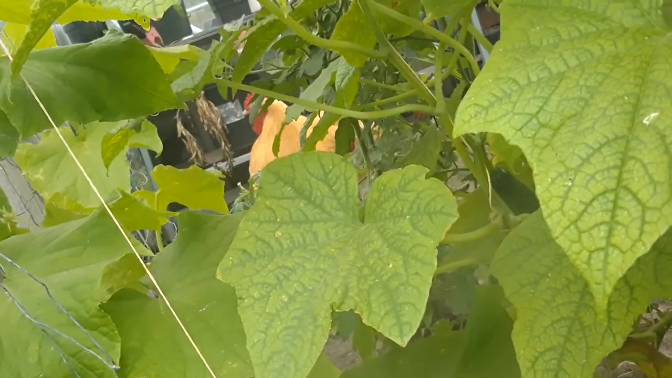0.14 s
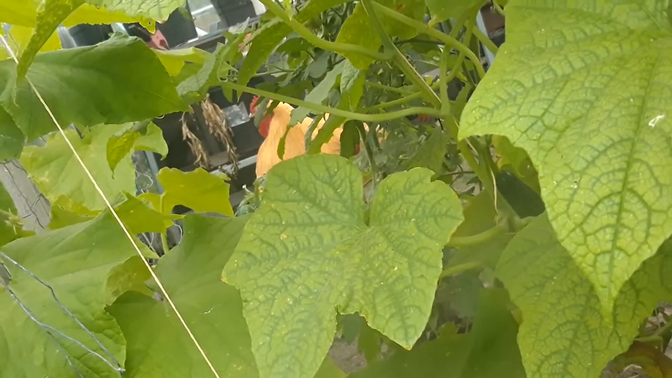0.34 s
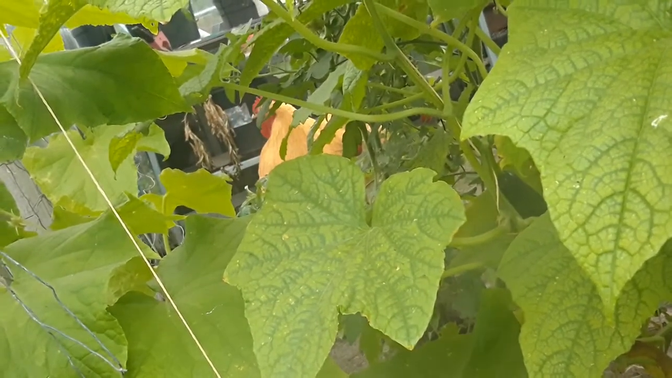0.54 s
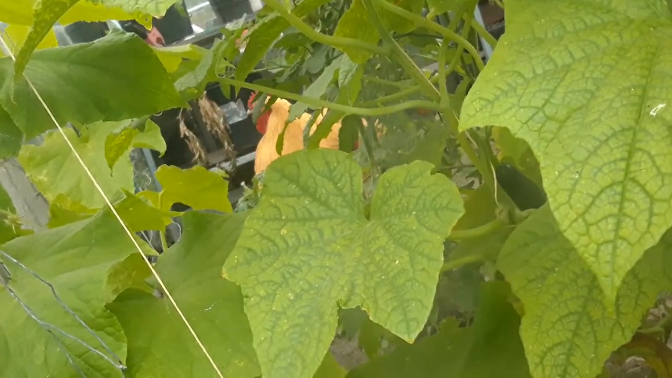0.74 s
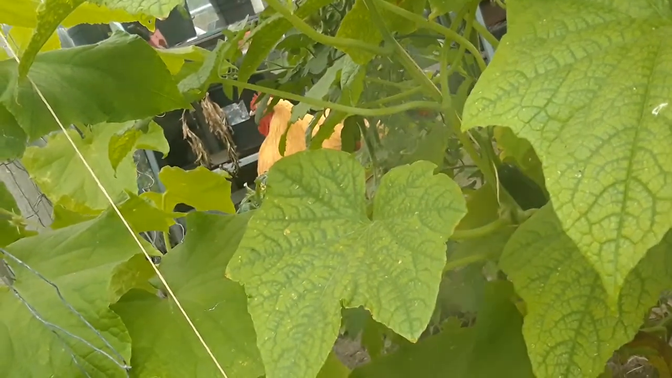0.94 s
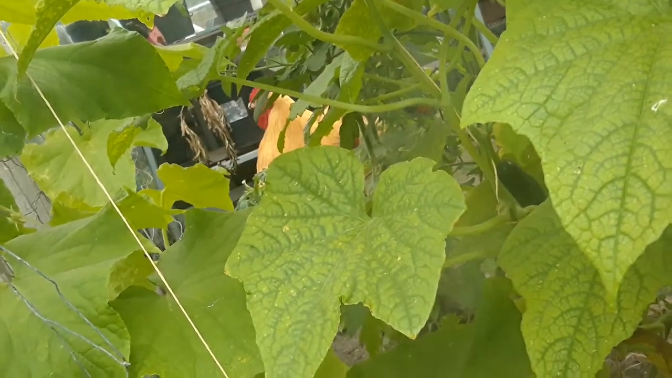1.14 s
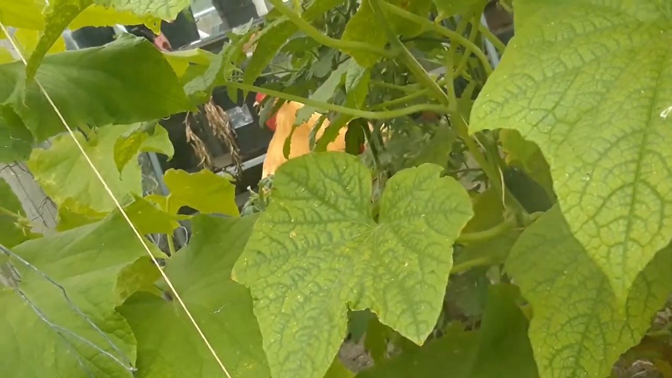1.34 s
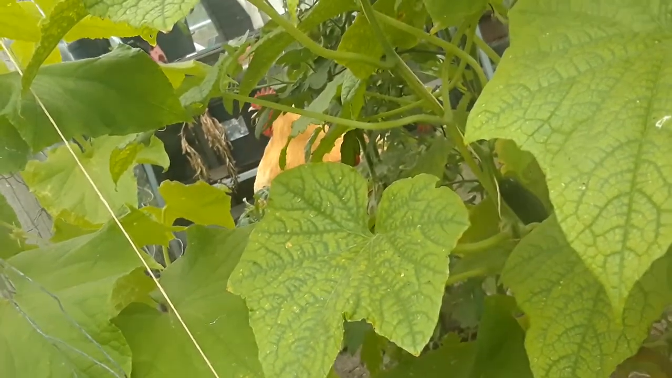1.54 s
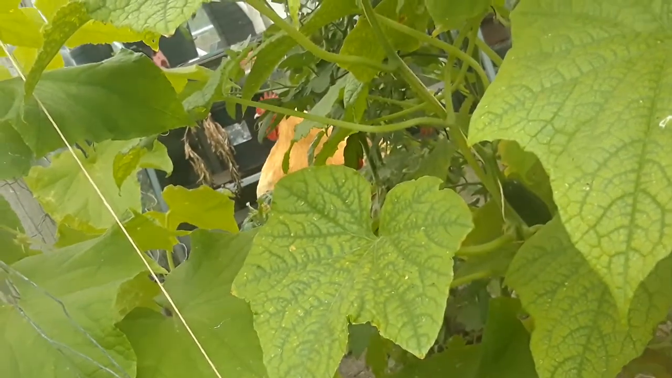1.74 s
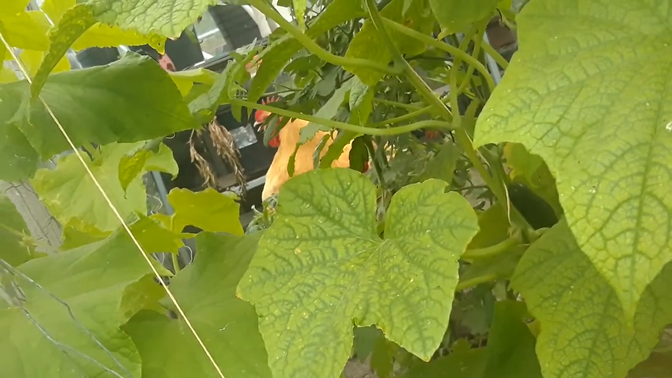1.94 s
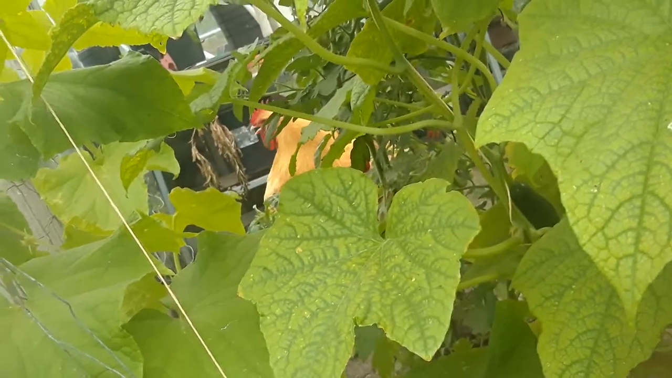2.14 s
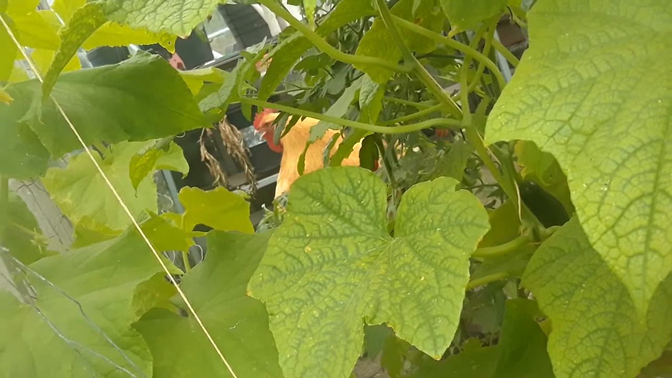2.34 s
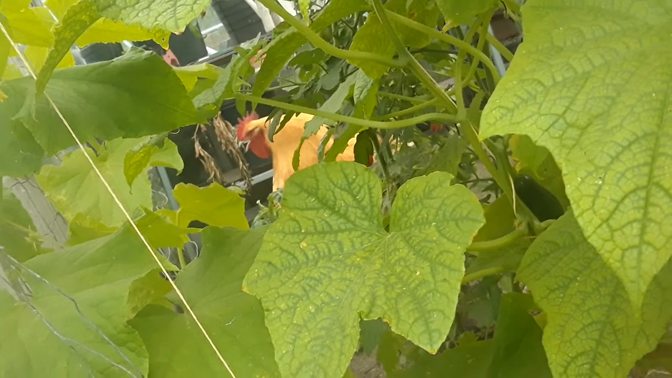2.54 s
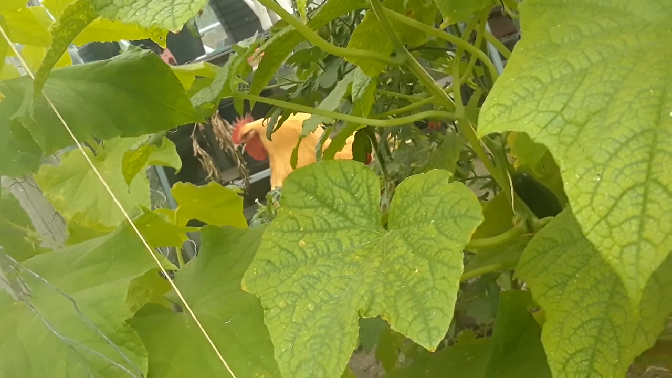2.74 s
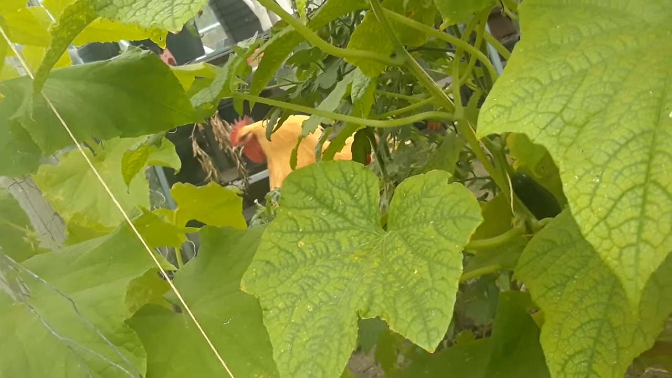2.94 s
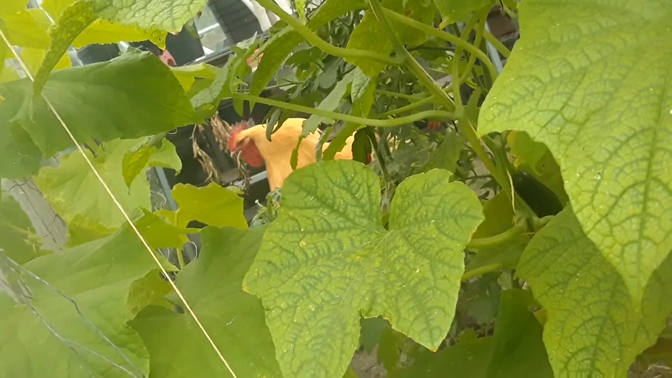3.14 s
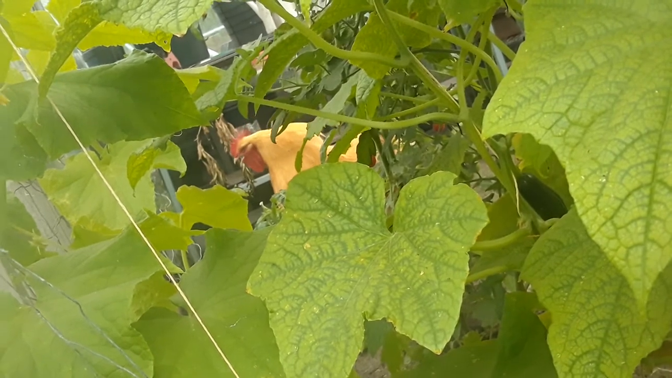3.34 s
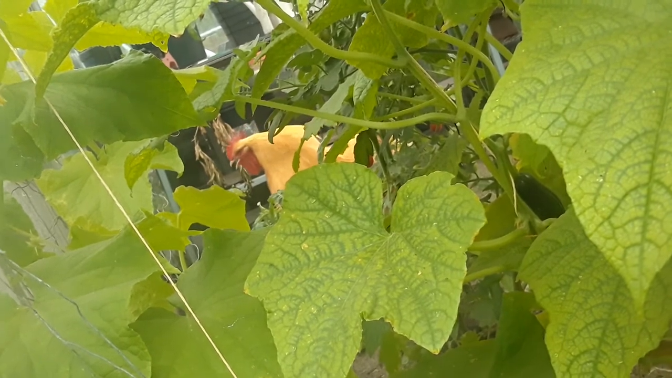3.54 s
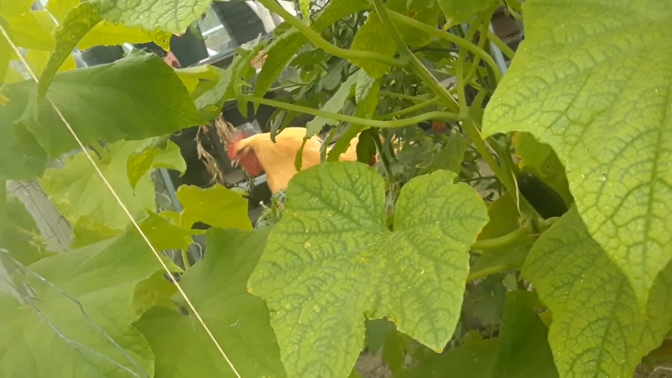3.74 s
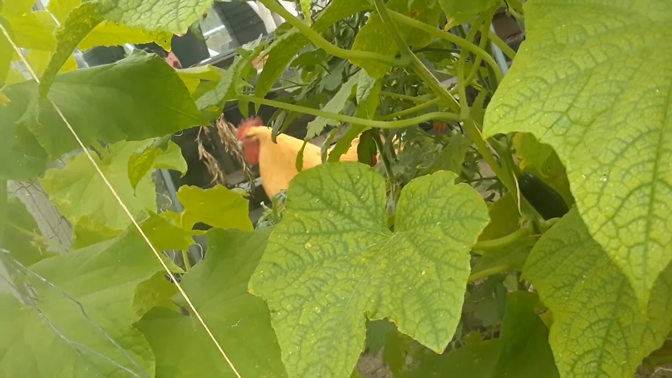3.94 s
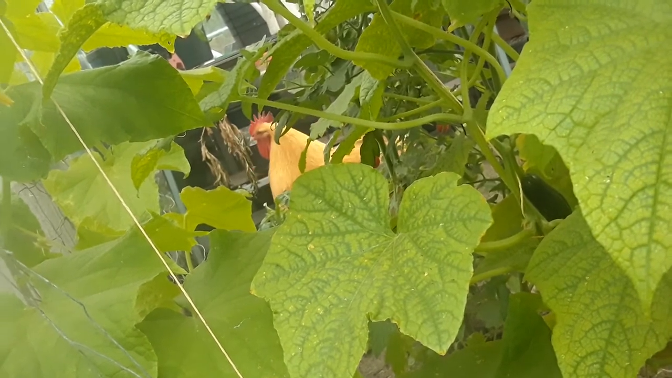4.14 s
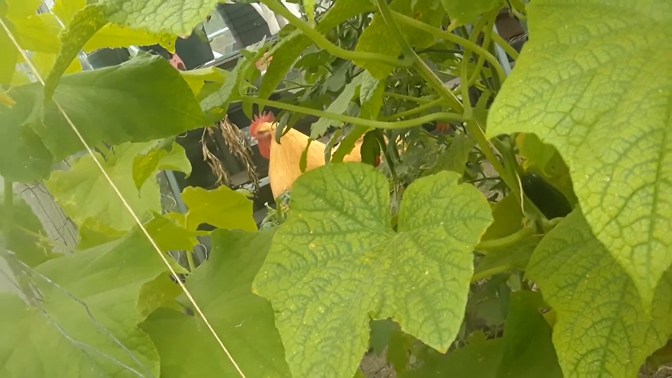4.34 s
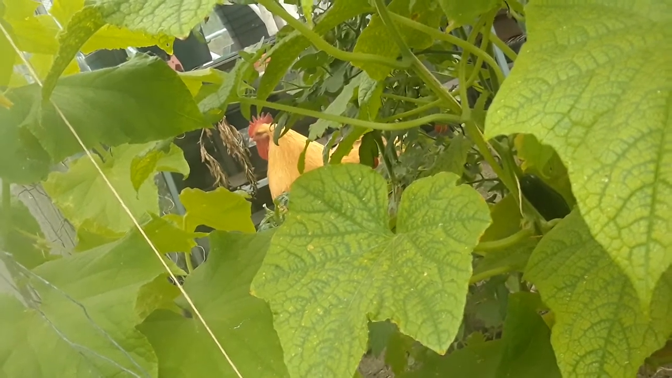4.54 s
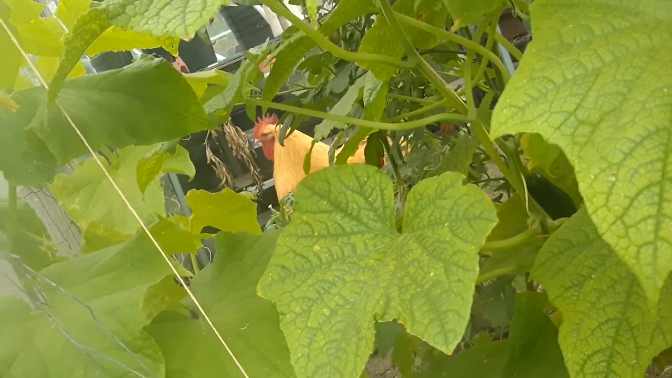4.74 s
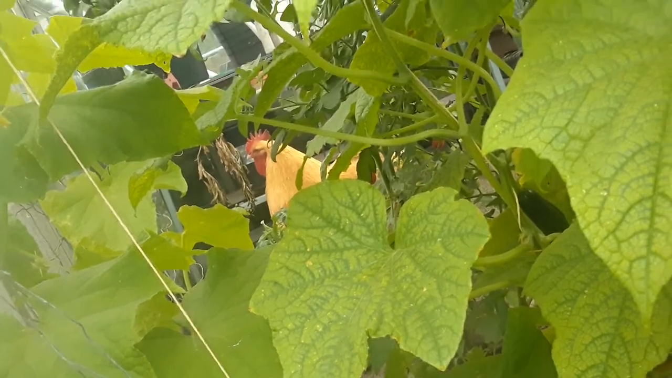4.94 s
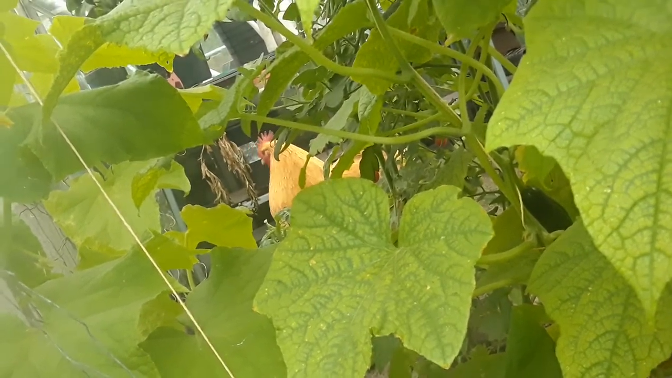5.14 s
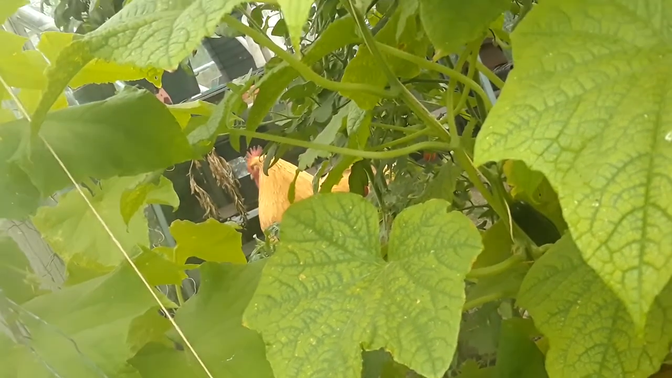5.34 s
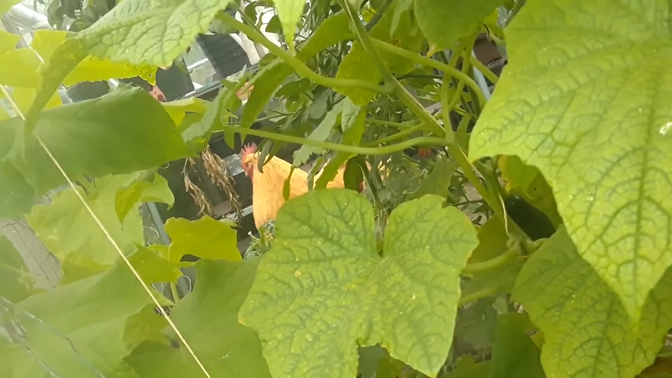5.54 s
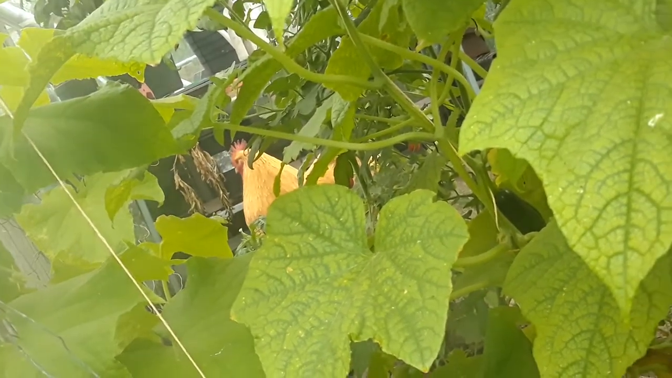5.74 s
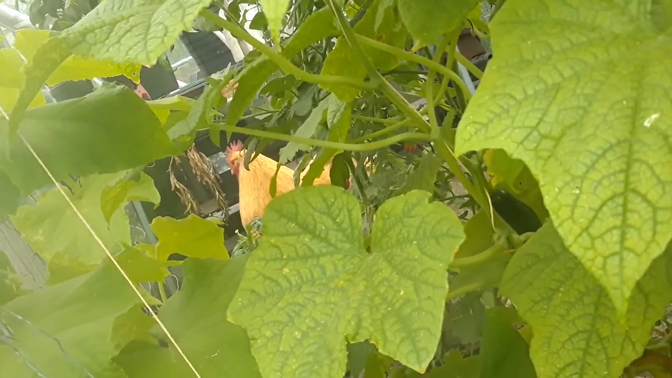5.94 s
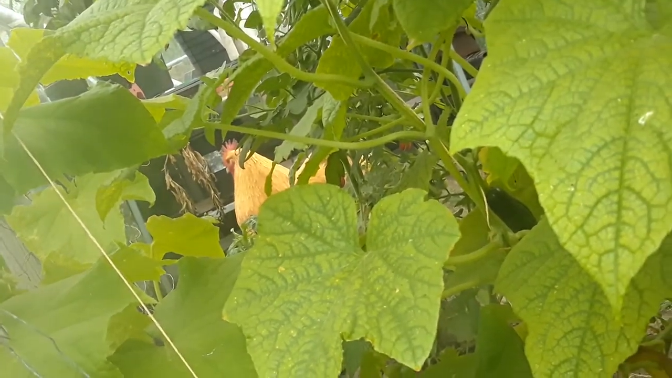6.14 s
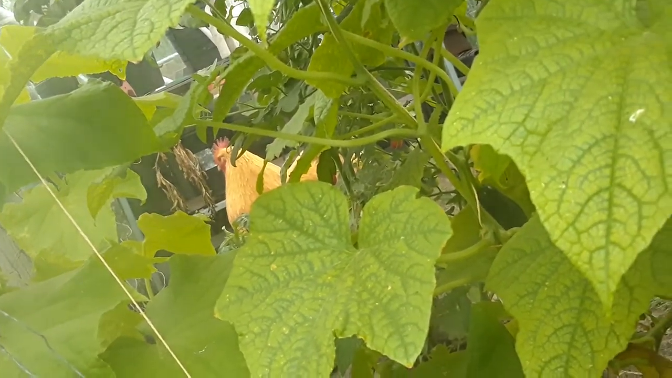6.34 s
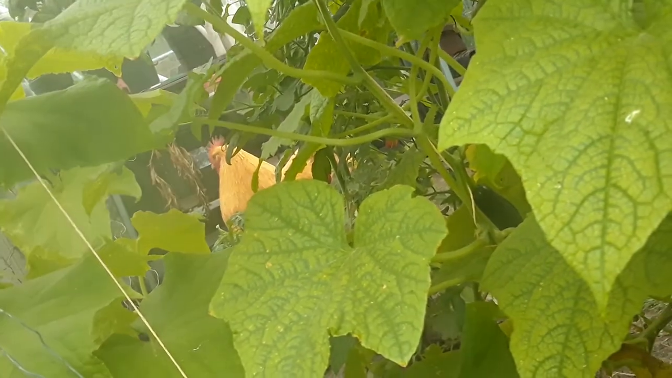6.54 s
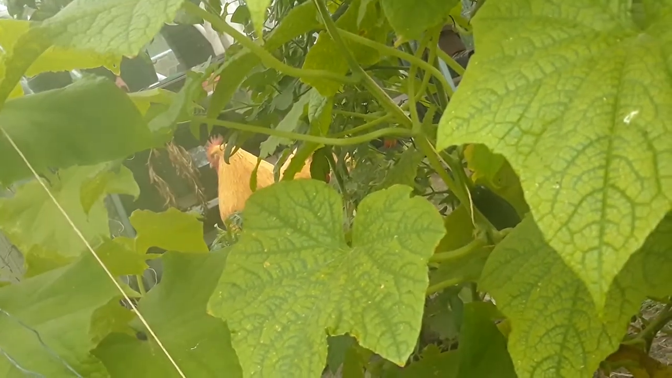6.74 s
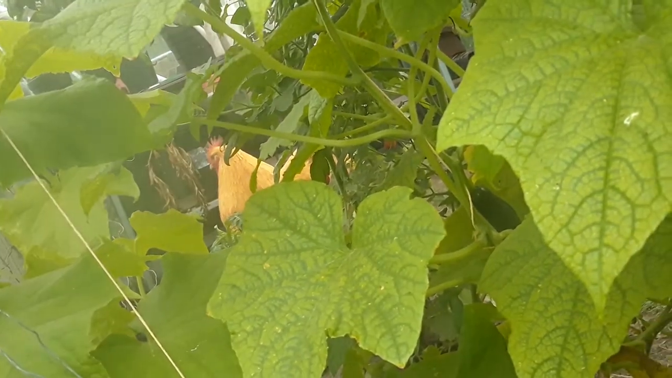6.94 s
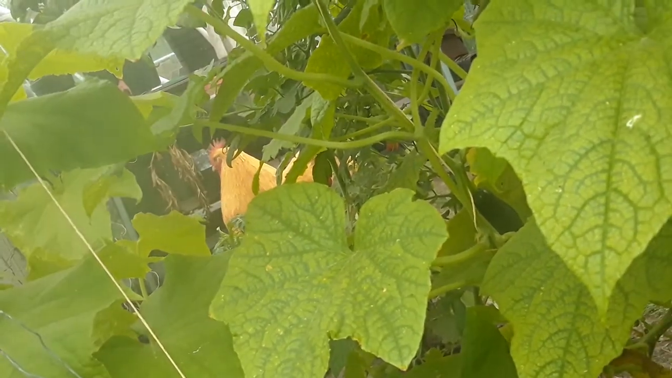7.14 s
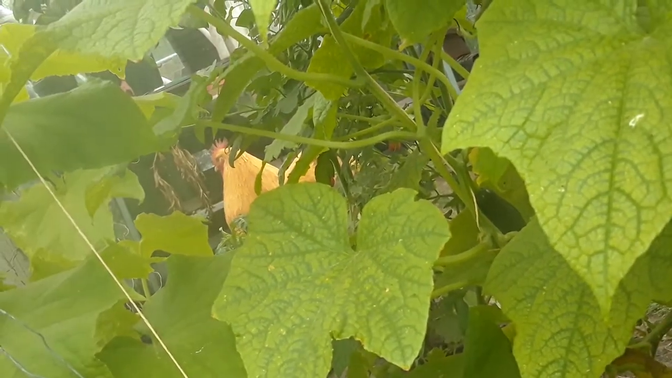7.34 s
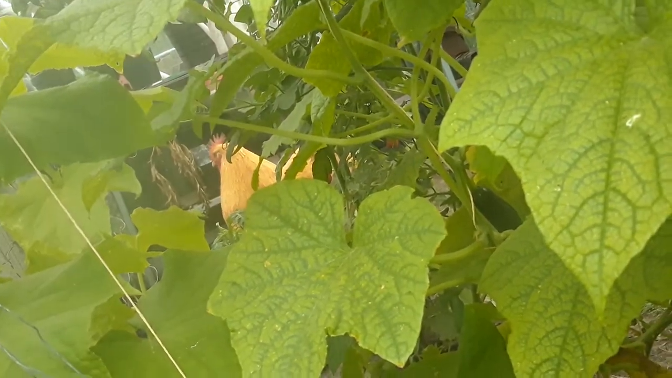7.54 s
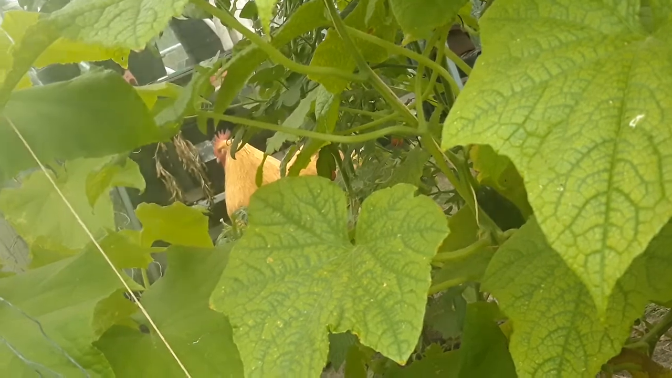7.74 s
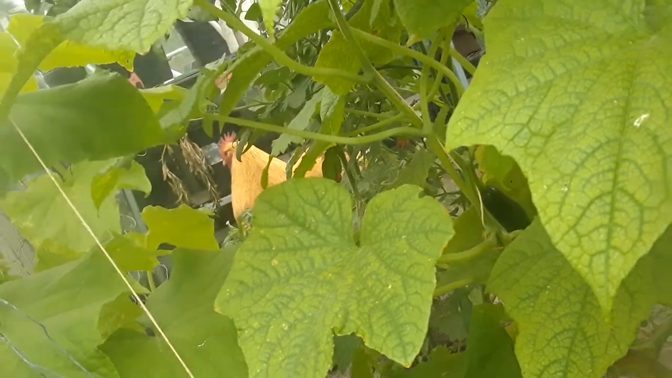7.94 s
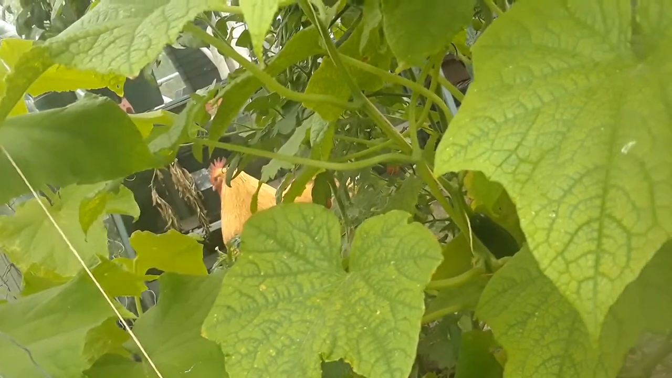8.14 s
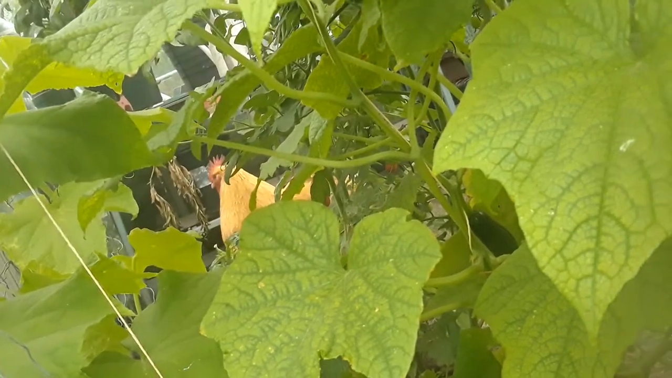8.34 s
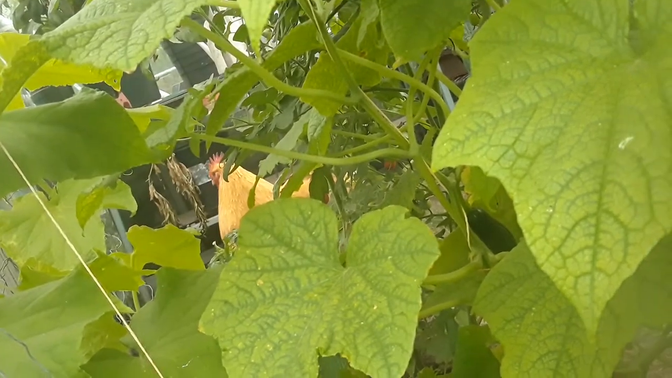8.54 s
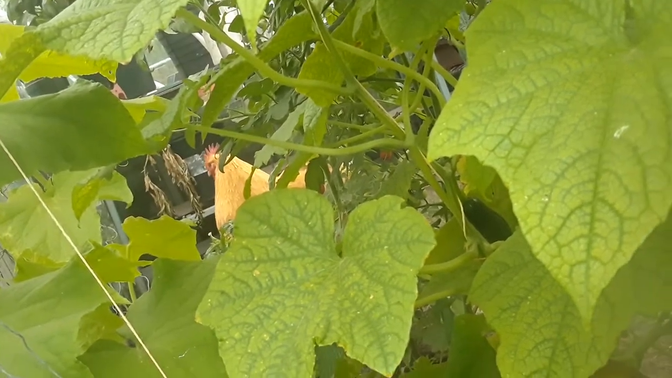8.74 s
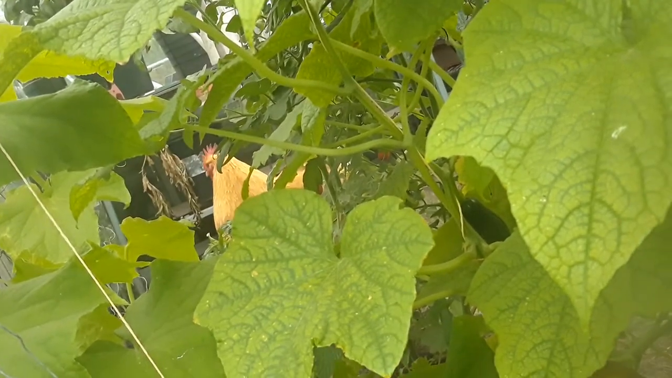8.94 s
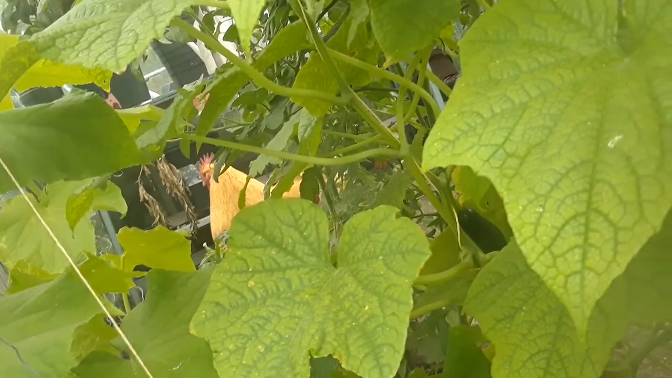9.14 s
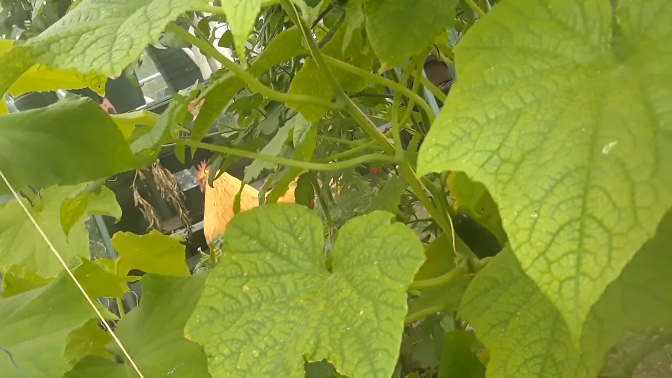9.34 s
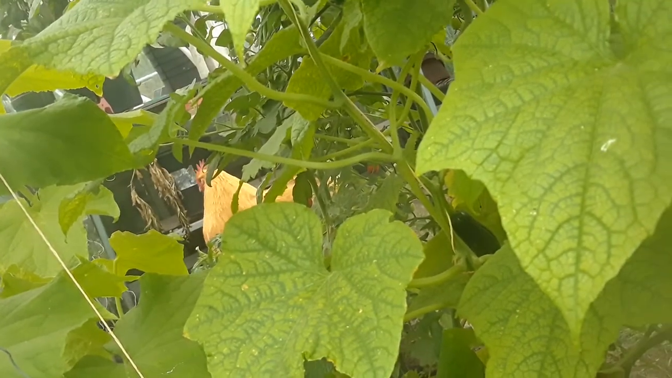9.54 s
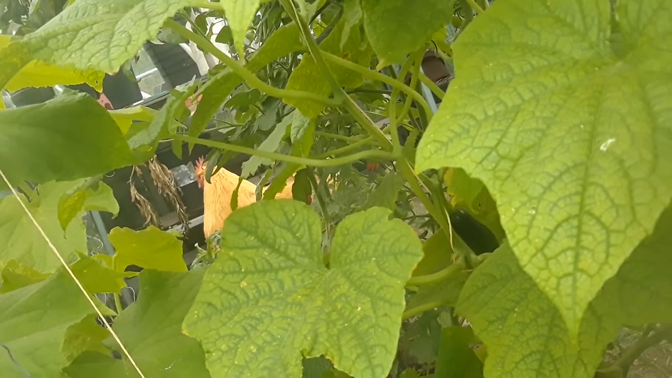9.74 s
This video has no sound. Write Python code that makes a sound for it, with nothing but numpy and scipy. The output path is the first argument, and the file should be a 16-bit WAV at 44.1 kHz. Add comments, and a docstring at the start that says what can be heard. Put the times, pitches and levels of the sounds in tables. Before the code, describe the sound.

Quiet outdoor hum with a few faint bird peeps. A rooster some metres away crows once: a low call, a short higher arch, then a long, increasingly hoarse note that sags and breaks off. A brief lull follows, then a hand shifts on the camera, making close dry rustles, sharp ticks, dull thumps and three very short squeaks until the end.

```python
"""Rooster crow and a camera handled in a vegetable garden

Faint bird peeps, then one three-syllable crow: a pulse train, hoarse under strain, coloured by a throat.
Then a hand shifts its grip on the camera: filtered noise and grains rustle as skin rubs the case,
damped ticks and thumps make sharp slips, and stick-slip pulses squeak three times.
A quiet outdoor hum of coloured noise lies under everything."""
import sys
import numpy as np
from scipy import signal
from scipy.fft import rfft, irfft, next_fast_len
from scipy.io import wavfile
from scipy.ndimage import uniform_filter1d, map_coordinates

SR = 44100
rng = np.random.default_rng(int(sys.argv[2]) if len(sys.argv) > 2 else 0)


def unload_audio(sound):
    """Save the sound as a 16-bit wav file, at the path given as the first command line argument."""
    columns = np.transpose(np.atleast_2d(sound))
    # keep every value between -1 and 1, then stretch to whole-number steps
    steps = np.round(np.clip(columns, -1, 1) * 32767)
    wavfile.write(sys.argv[1], SR, steps.astype(np.int16))


N = 436149
TOP_HZ = 16500

# Levels of the crow as heard at the microphone, dips from echoes included, one list per syllable.
# Each row: time in seconds, then the levels in dB of the fundamental, the throat ring and the rasp.
CROW_LEVELS = [
    [(1.385, -77, -73.5, -77), (1.41, -31.5, -32, -35.5), (1.53, -15, -28.5, -33), (1.585, -13.5, -32, -35),
     (1.64, -29, -35, -43), (1.71, -51.5, -55.5, -63.5)],
    [(1.74, -14, -25.5, -25.5), (1.82, -23.5, -15.5, -22.5), (1.875, -13.5, -22.5, -23.5),
     (1.935, -22, -32, -42), (1.97, -29.5, -31.5, -35)],
    [(1.98, -10, -27, -29.5), (2.02, -20.5, -26, -27.5), (2.3, -18.5, -20.5, -26), (2.5, -20.5, -20, -26),
     (2.84, -30, -22.5, -28.5), (2.89, -16, -23.5, -28), (3.07, -21.5, -24.5, -29), (3.13, -37, -30, -28),
     (3.25, -17, -25, -25.5), (3.33, -28, -36, -28.5), (3.43, -23, -34, -32), (3.71, -26, -35.5, -36),
     (3.85, -45, -42, -47), (3.95, -69, -95, -95)],
]


def amp(db):
    """Decibels to gain."""
    return 10 ** (np.asarray(db) / 20)


def unit(x):
    """x at rms 1."""
    return x / np.sqrt(np.mean(x ** 2) + 1e-20)


def steady(x):
    """x with its slow level held at rms 1."""
    power = np.abs(uniform_filter1d(x ** 2, size=1300))
    return x / np.sqrt(power + 1e-12)


def along(points, hz):
    """Interpolate (Hz, value) points on a log-frequency axis."""
    point_hz, value = np.transpose(points)
    return np.interp(np.log(hz + 1), np.log(point_hz + 1), value)


def curves(rows):
    """One value per sample for each column after the time."""
    time_s, *columns = np.transpose(rows)
    return [np.interp(np.arange(N) / SR, time_s, column) for column in columns]


def during(start_s, end_s, edge_s):
    """1 from start to end, with soft edges."""
    t = np.arange(N) / SR
    return np.clip(np.minimum(t - start_s, end_s - t) / edge_s + .5, 0, 1)


def wobble(knots_per_s):
    """A smooth random curve."""
    knots = rng.standard_normal(int(N * knots_per_s / SR) + 4)
    return map_coordinates(knots, [np.arange(N) * knots_per_s / SR])


def filtered(x, response):
    """x times a response of frequency."""
    size = next_fast_len(N + SR // 2)
    return irfft(rfft(x, size) * response(np.fft.rfftfreq(size, 1 / SR)), size)[:N]


def coloured(x, spectrum):
    """x shaped by (Hz, dB) points, at rms 1."""
    return unit(filtered(x, lambda hz: amp(along(spectrum, hz))))


def below(hz, edge_hz, order=16):
    """Gain of a low-pass."""
    return 1 / (1 + (hz / edge_hz) ** order)


def air():
    """Distant outdoor hum: coloured noise, hollower once the hand shades the microphone."""
    # Each row: time in seconds, level in dB, treble change in dB; both also wander at random.
    air_levels = [(0, -55, 2.5), (4.4, -57.5, -0.5), (5.3, -58.5, 4.5), (6.9, -56.5, -7), (7.38, -60, -18),
                  (7.7, -60.5, -3.5), (8.3, -57.5, -12), (9.89, -55, -9.5)]
    # Spectra with the microphone open and shaded. Each row: frequency in Hz, relative density in dB per Hz.
    open_spectrum = [(15, -41.5), (25, -9.5), (92, 0), (108, 2), (127, -18), (180, -10.5), (242, -17.5),
                     (335, -23), (516, -24), (659, -21), (734, -20), (796, -13.5), (1160, -15),
                     (1290, -21.5), (2110, -17.5), (2760, -32.5), (4870, -29), (6740, -29), (8590, -25),
                     (10700, -49), (16000, -49.5)]
    shaded_spectrum = [(15, -57), (25, -61), (64, -4), (170, -17), (236, -19.5), (270, -17), (451, -18.5),
                       (818, -15.5), (988, -8), (1230, -23.5), (1560, -17), (2350, -30.5), (4490, -17.5),
                       (5140, -17), (8360, -17), (10700, -50), (16000, -41)]
    level_db, treble_db = curves(air_levels)
    shade = np.clip((np.arange(N) / SR - 6) / 1.4, 0, 1)
    open_air = coloured(rng.standard_normal(N), open_spectrum)
    shaded_air = coloured(rng.standard_normal(N), shaded_spectrum)
    hum = np.sqrt(1 - shade) * open_air + np.sqrt(shade) * shaded_air
    low = filtered(hum, lambda hz: below(hz, 2600))
    level = amp(level_db + 0.24 * wobble(1.6))
    treble = amp(treble_db + wobble(6.3))
    return level * (low + treble * (hum - low))


def garden(x):
    """Leaves and fences scatter a short echo: decaying noise, shorter in the treble."""
    # Each row: frequency in Hz, time to decay by 60 dB in seconds.
    decay_times = [(300, .5), (2000, 0.44), (10000, 0.092)]
    hz, t, noise = signal.stft(rng.standard_normal(SR // 2), SR, nperseg=256)
    decay = amp(-60 * t / along(decay_times, hz)[:, None])
    tail = signal.istft(noise * decay, SR, nperseg=256)[1]
    delayed = np.pad(x, (200, 0))
    return signal.fftconvolve(delayed, tail / np.linalg.norm(tail))[:N]


def peeps():
    """Thin peeps rich in harmonics droop in pitch; mellower calls, nearer a sine, droop less or not at all."""
    # Far whistle, small bird's peeps, mellow answer to the crow. Each row: start in seconds,
    # length in seconds, pitch in Hz, level in dB, share of the fundamental (0-1).
    calls = [(0, 1.2, 2160, -66, 1), (.13, .15, 1720, -60, .1), (.21, .07, 1680, -57, .1),
             (.615, .05, 1650, -56, .1), (1.085, .055, 1830, -51, .1), (4.28, .6, 742, -63, .72)]
    out = np.zeros(N)
    for start_s, length_s, pitch_hz, level_db, mellow in calls:
        u = np.linspace(0, 1, int(length_s * SR))
        droop = .16 * (1 - mellow) * u ** 3
        flutter = .14 * rng.standard_normal(len(u))
        phase = 2 * np.pi * np.cumsum(pitch_hz * (1 - droop + flutter)) / SR
        thin = 0.65 * np.sin(2 * phase) + np.sin(3 * phase) + 0.13 * np.sin(4 * phase)
        note = mellow * np.sin(phase) + (1 - mellow) * thin
        envelope = np.sqrt(np.abs(np.sin(np.pi * u)))
        out[int(start_s * SR):][:len(u)] += amp(level_db) * unit(note * envelope)
    return out


def grains(rate_hz, tilt_db):
    """Tiny catches of skin of random size, some shrunk further by a random amount in dB if tilt_db is negative."""
    catches = rng.random(N) < rate_hz / SR
    size = rng.standard_normal(N)
    return unit(catches * size * amp(tilt_db * np.minimum(rng.exponential(size=N), 4)))


def stroke(start_s, length_s, attack_s, release_s, swell_db):
    """Gain of one stroke: the pressure builds, swells or fades steadily, and lets go."""
    edge_db = 19  # rise from, and sink to, this far below full level
    t = np.clip(np.arange(N) / SR - start_s, 0, length_s)
    contact = np.minimum(np.minimum(t / attack_s, (length_s - t) / release_s), 1)
    gain = amp(edge_db * (contact - 1) + swell_db * (t / length_s - .5))
    return during(start_s, start_s + length_s, .004) * gain


def rubbing(crackle=0.76, bass_hz=130):
    """Skin drags over the case: a lumpy rumble under a crackling hiss; a firm, flat grip is deeper and duller."""
    # Each row: start, length, attack and release in seconds, rumble and hiss levels in dB,
    # swell from start to end in dB, bass weight in dB, upper edge of the hiss in Hz.
    strokes = [(4.704, 0.045, 0.0074, 0.028, -49.5, -76.5, 0, 12, 9000),
               (4.748, .42, .02, .01, -59.5, -79, -3, 9, 8950),
               (5.172, 0.078, 0.023, 0.038, -26.5, -32.5, -2, -21, 12150),
               (5.497, 0.31, 0.064, 0.063, -35.5, -43.5, -2.5, -3, 12200),
               (5.83, 0.13, 0.0089, 0.06, -44, -49, -5, 7, 14000),
               (5.929, 0.23, .02, 0.023, -42.5, -59, 6, -4, 14000),
               (6.153, 0.31, 0.015, .02, -40.5, -47, 2, -11, 11200),
               (6.416, 0.37, 0.067, 0.073, -33, -39, -5, -4.5, 10500),
               (6.972, 0.17, .004, .03, -37.5, -41, -8, 12.5, 4180),
               (7.121, 0.22, 0.035, .06, -47, -48, -12.5, 10, 4070),
               (7.428, 0.13, 0.041, 0.031, -46, -60, -1, 12, 9000),
               (7.532, .1, 0.084, 0.02, -39, -43, -7, -2, 9300),
               (8.019, 0.066, 0.023, 0.017, -47, -54.5, -4, -2, 9100),
               (8.725, 0.16, 0.031, 0.097, -61, -50.5, -2, 10, 6000),
               (9.14, 0.11, .01, .01, -53, -52.5, 3, -1, 10000),
               (9.232, 0.099, .045, .035, -44, -41, 0, 15, 10000),
               (9.391, .105, 0.026, .01, -55.5, -35, 8.5, 8, 6530),
               (9.483, .04, 0.0048, .02, -41, -42, -4, 10, 6500)]
    # Spectra of rumble and hiss. Each row: frequency in Hz, relative density in dB per Hz.
    rumble_spectrum = [(24, -34.5), (40, -8), (183, 4), (360, 3), (648, -2), (841, -4), (1340, -8.5),
                       (1680, -14.5), (2500, -32), (3250, -51), (5500, -120)]
    hiss_spectrum = [(700, -28), (1400, -15), (2500, -12.5), (4000, -15.5), (7500, -11.5), (10000, -26),
                     (16000, -17)]
    pressure = wobble(70)
    rumble_source = grains(900, tilt_db=-1.5) + .5 * rng.standard_normal(N)
    rumble = coloured(rumble_source, rumble_spectrum) * amp(2 * pressure)
    bass = filtered(rumble, lambda hz: below(hz, bass_hz, order=4))
    hiss_source = crackle * grains(270, tilt_db=0) + rng.standard_normal(N)
    hiss = coloured(hiss_source, hiss_spectrum) * amp(2.7 * pressure)
    out = np.zeros(N)
    for start_s, length_s, attack_s, release_s, rumble_db, hiss_db, swell_db, bass_db, edge_hz in strokes:
        muffled = filtered(hiss, lambda hz: below(hz, edge_hz, order=3))
        deep = rumble + (amp(bass_db) - 1) * bass
        rub = amp(rumble_db) * deep + amp(hiss_db) * muffled
        out += stroke(start_s, length_s, attack_s, release_s, swell_db) * rub
    return out


def squeaks(damping=0.69, uneven_db=2, soft_hz=7000):
    """Uneven stick-slip pulses race through a glide and ring the case."""
    # Each squeak: case resonance in Hz, then glide rows of time in seconds, slips per second
    # and level in dB; rate and level also waver at random.
    glides = [(5720, [(6.488, 5000, -45.5), (6.49, 3200, -17), (6.494, 2600, -18.5), (6.499, 1500, -19),
              (6.5025, 700, -18)]), (2820, [(9.4172, 700, -7.5), (9.421, 1600, -9.5), (9.4228, 2300, -26),
              (9.4245, 3300, -4.5), (9.4255, 4000, -23), (9.428, 5000, -28.5)]), (2980, [(9.47, 5400, -7),
              (9.4715, 4800, -16), (9.478, 2900, -9), (9.484, 1300, -10.5), (9.4905, 600, -11.5)])]
    out = np.zeros(N)
    grip = amp(uneven_db * wobble(700))
    drift = 1 + .04 * wobble(600)
    for ring_hz, glide in glides:
        time_s, slip_hz, level_db = np.transpose(glide)
        start = int(time_s[0] * SR)
        t = np.arange(time_s[0], time_s[-1], 1 / SR)
        rate_hz = np.abs(np.interp(t, time_s, slip_hz)) * drift[start:][:len(t)]
        phase = 2 * np.pi * np.cumsum(rate_hz) / SR
        hz = np.arange(1, 25)[:, None] * rate_hz  # harmonics of the slip rate
        damped = 1j * hz * ring_hz * damping
        case = 1j * hz * ring_hz / (ring_hz ** 2 - hz ** 2 + damped)
        case = case / (1 + 1j * hz / soft_hz) ** 2 * (hz < TOP_HZ)
        wave = np.sum(case * np.exp(1j * phase * hz / rate_hz), axis=0).real
        wave /= np.sqrt(np.sum(np.abs(case) ** 2, axis=0) / 2)
        edges = np.minimum(np.minimum(t - t[0], t[-1] - t) / .0006, 1)
        out[start:][:len(t)] += amp(np.interp(t, time_s, level_db)) * wave * edges
    return out * grip


def faint_slips():
    """Faint slips come by chance as the hand takes hold, as rows like those of the clear slips."""
    from_s, to_s, count = 4.72, 5.18, 4
    tick_db, tick_hz, thump_db, spread_db = -31, 7700, -45, 3.5
    times_s = from_s + (to_s - from_s) * (np.arange(count) + rng.random(count)) / count
    scatter_db = spread_db * rng.standard_normal((count, 2))
    return [(s, tick_db + tick, tick_hz, thump_db + thump)
            for s, (tick, thump) in zip(times_s, scatter_db)]


def slips(thump_gain_db=9, thump_hz=520, thump_life_s=0.0015, tick_life_s=0.00013,
          snap=0.37, snap_life_s=0.00011, creep=0.042, soft_hz=12000):
    """Each slip is a very short tick amid a little scraping, and the case answers with one heavily damped swing."""
    # Each row: time in seconds (the tick falls 1.5 ms later), tick level in dB, tick pitch in Hz,
    # thump level in dB before thump_gain_db.
    clear_slips = [(4.9984, -46, 7300, -39.5), (5.0438, -35, 7080, -32), (5.0766, -51, 7660, -35),
                   (5.1522, -45, 2030, -40), (5.1931, -0.5, 4350, -29), (5.204, -5.5, 7430, -20.5),
                   (5.2287, -15.5, 7620, -24.5), (5.4225, -59, 2010, -37), (5.4789, -26.5, 6970, -28),
                   (5.6869, -24, 2750, -24), (5.7746, -17, 5960, -25), (5.8387, 0, 7750, -17.5),
                   (5.9385, -14.5, 7840, -29.5), (5.9619, -12, 7500, -25.5), (6, -15.5, 3800, -24.5),
                   (6.0438, -7, 6860, -21.5), (6.077, -8, 6400, -21), (6.1015, -16.5, 6730, -24.5),
                   (6.119, -22, 2850, -32), (6.1544, -7.5, 6900, -22.5), (6.5555, -16, 2440, -24),
                   (6.6061, 0.5, 1880, -30), (6.6933, 0, 1930, -48), (6.9727, -15, 2270, -29),
                   (7.0135, 1.5, 1980, -51), (7.0303, -15, 2660, -38), (7.0757, 1, 6300, -54),
                   (7.5009, -9.5, 2250, -23.5), (7.5774, -14, 6100, -33.5), (7.6854, -16.5, 6300, -74),
                   (7.7402, -16.5, 5800, -32), (7.7997, -13, 9080, -27.5), (8.0372, -17, 7660, -31),
                   (8.0622, -20, 6890, -31), (8.0974, -20, 7040, -69), (8.4105, -27.5, 1940, -30),
                   (8.5956, -17.5, 8400, -26), (8.7663, -5.5, 8440, -28), (9.0745, -7, 3360, -22.5),
                   (9.1397, 0.5, 8440, -22), (9.6041, -26.5, 4820, -61)]
    out = np.zeros(N)
    t = np.arange(-SR // 200, SR // 50) / SR
    after = np.maximum(t, 0)
    rows = list(clear_slips) + faint_slips()
    for (time_s, tick_db, tick_hz, thump_db), chance in zip(rows, rng.standard_normal(len(rows))):
        tick = np.cos(2 * np.pi * tick_hz * t) * np.exp(-after / tick_life_s)
        tick += snap * np.sin(np.pi * tick_hz * t / 2) * np.exp(-after / snap_life_s)
        scrape_life_s = np.where(t < 0, .0006, .0016)
        scrape = creep * rng.standard_normal(len(t)) * np.exp(-np.abs(t) / scrape_life_s)
        swing_hz = thump_hz * np.exp(0.33 * chance)
        swing = np.sin(2 * np.pi * swing_hz * after) * np.exp(-after / thump_life_s)
        slip = amp(tick_db) * (tick * (t >= 0) + scrape) - amp(thump_db + thump_gain_db) * swing
        out[int((time_s + .0015 + t[0]) * SR):][:len(t)] += slip
    return filtered(out, lambda hz: below(hz, soft_hz, order=4) * 1j * hz / (1j * hz + 130))


def crowing():
    """1 while the rooster calls."""
    return during(CROW_LEVELS[0][0][0], CROW_LEVELS[-1][-1][0], .005)


def hoarseness():
    """Roughness and period doubling grow with strain until the voice clears; breaks set a least roughness."""
    # The voice breaks as it starts, changes note, is forced and runs out.
    # Each row: start in seconds, end in seconds, least roughness (0-1).
    voice_breaks = [(1.353, 1.48, 0.62), (1.48, 1.6, 0.4), (1.6, 1.754, .6), (1.909, 2.03, 0.4),
                    (2.54, 3.07, .26), (3.49, 3.575, 0.65), (3.665, 3.75, 0.4), (3.817, 3.97, 0.54)]
    clean_rough, edge_s = .07, .03
    strain_from_s, strain_to_s = 1.68, 3.08
    strain_rough, rough_power = 0.5, 2.4  # powers above 1: slow at first
    strain_doubling, doubling_power = 0.45, 1.35
    held = np.clip((np.arange(N) / SR - strain_from_s) / (strain_to_s - strain_from_s), 0, 1)
    strain = held * during(strain_from_s, strain_to_s, edge_s)
    breaks = sum(rough * during(start_s, end_s, edge_s) for start_s, end_s, rough in voice_breaks)
    roughness = np.maximum(clean_rough + strain_rough * strain ** rough_power, breaks)
    return np.clip([roughness, strain_doubling * strain ** doubling_power], 0, 1)


def syrinx():
    """A pulse train that skips into period doubling and hoarse noise under strain."""
    # A low call, a short arch, a long note that sags at the end.
    # One list per syllable, each row: time in seconds, pitch in Hz.
    melody = [
        [(1.39, 431), (1.48, 499.9), (1.62, 512.8), (1.7, 491)],
        [(1.72, 530.5), (1.765, 673.8), (1.835, 679.2), (1.875, 652.4), (1.95, 526)],
        [(1.98, 628), (2.035, 681), (2.095, 649.3), (2.17, 663.8), (2.48, 669.7), (2.72, 658.5), (2.92, 627.8),
         (3.1, 649.4), (3.28, 634.8), (3.36, 599.8), (3.53, 563.4), (3.61, 584.7), (3.665, 556.7),
         (3.695, 459.3), (3.9, 364.6)],
    ]
    jitter, strain_jitter = .002, .011  # relative pitch unsteadiness: clear voice, added by hoarseness
    overtone_lag_rad = .35  # times harmonic number squared; smears each pulse
    pitch_hz, = curves(np.vstack(melody))
    rough, doubling = hoarseness()
    unsteady = jitter * wobble(90) + strain_jitter * (rough + .4 * doubling) * wobble(350)
    pitch_hz = pitch_hz * (1 + unsteady)
    phase = 2 * np.pi * np.cumsum(pitch_hz) / SR
    # when the membranes double their period, every other pulse is weaker
    phase = phase + .3 * doubling * np.sin(phase / 2)
    live = crowing() > .5
    pulses = np.zeros(N)
    for k in range(1, 33):
        overtone = np.cos(k * phase[live] - overtone_lag_rad * k ** 2)
        pulses[live] += overtone * (k * pitch_hz[live] < TOP_HZ)
    pulses *= 1 + .8 * doubling * np.cos(phase / 2) + .35 * rough * wobble(250)
    # air tears through once a cycle and takes over in the treble
    turbulence = rng.standard_normal(N) * (1 + np.cos(phase))
    turbulence = filtered(turbulence, lambda hz: (.5 + hz / 3000) * (1 - below(hz, 480, order=6)))
    return steady(pulses) + rough * turbulence


def rooster():
    """The syrinx sounds through a throat that changes shape as the neck stretches, then through the foliage."""
    # Throat colours: first note, head raised, neck stretched. Each row: frequency in Hz, relative gain in dB.
    opening_throat = [(200, -33.5), (350, -25), (505, -2.5), (720, -11.5), (1000, -18.5), (1280, -26),
                      (1700, -20), (2350, -27), (3800, -19.5), (5300, -40.5), (6300, -34.5), (9000, -38),
                      (10500, -53), (16000, -74)]
    raised_throat = [(250, -20.5), (450, -13), (670, -9), (950, -11.5), (1330, -22), (2000, -9.5),
                     (2250, -33), (3350, -19.5), (4300, -35), (5400, -17.5), (7000, -30), (11500, -38.5),
                     (13000, -53), (16000, -62)]
    stretched_throat = [(250, -10), (450, 2.5), (650, 1.5), (980, -16), (1300, -23), (1950, -18),
                        (2250, -33), (2950, -18), (3400, -39.5), (4250, -5), (4700, -28), (5750, -8.5),
                        (6750, -32.5), (7450, -19.5), (8200, -41), (8800, -21), (9300, -41.5), (10800, -36),
                        (15000, -59)]
    head_up_s, head_up_takes_s = 1.68, .055
    stretch_s, stretch_takes_s = 2.47, 0.071
    source = syrinx()
    t = np.arange(N) / SR
    raised = np.clip((t - head_up_s) / head_up_takes_s, 0, 1)
    stretched = np.clip((t - stretch_s) / stretch_takes_s, 0, 1)
    voice = (1 - raised) * coloured(source, opening_throat)
    voice += (raised - stretched) * coloured(source, raised_throat)
    voice += stretched * coloured(source, stretched_throat)
    # leaves scatter short waves the most
    voice = voice + filtered(garden(voice), lambda hz: np.minimum(hz / 4500, 1.2))
    # the small throat radiates little bass
    voice = filtered(voice, lambda hz: 1 - below(hz, 350, order=6))
    fundamental = filtered(voice, lambda hz: below(hz, 890))
    ring = filtered(voice, lambda hz: below(hz, 2420)) - fundamental
    rasp = voice - ring - fundamental
    levels_db = curves(np.vstack(CROW_LEVELS))
    parts = zip(levels_db, (fundamental, ring, rasp))
    return crowing() * sum(amp(level_db) * steady(part) for level_db, part in parts)


def scene():
    """The birds stand out in the garden; the handling is right at the microphone and has no echo."""
    crow, far = rooster(), peeps()
    echo = garden(amp(-12.0) * crow + amp(-10) * far)
    handling = slips() + rubbing() + squeaks()
    return (crow + far + echo + handling + air())[None]


def record(dry):
    """The camera's bass cut, clipping at full scale and band limit."""
    bass_cut = signal.butter(2, 45, "highpass", fs=SR, output="sos")
    sound = signal.sosfilt(bass_cut, dry[0])
    return filtered(np.clip(sound, -1, 1), lambda hz: below(hz, TOP_HZ, order=120))[None]


dry = scene()
out = record(dry)
unload_audio(out)
```